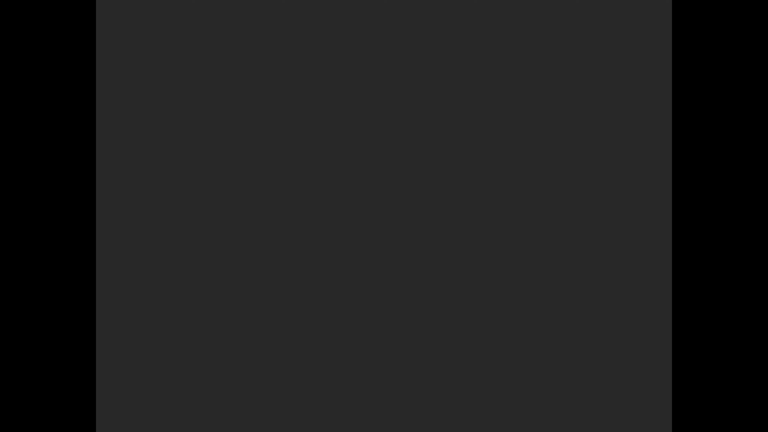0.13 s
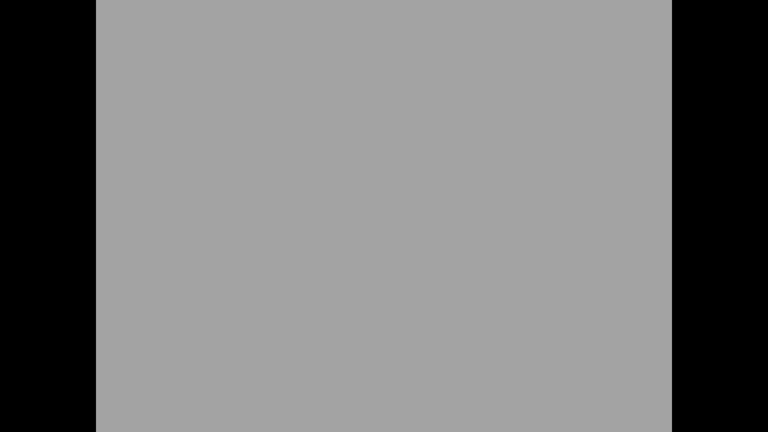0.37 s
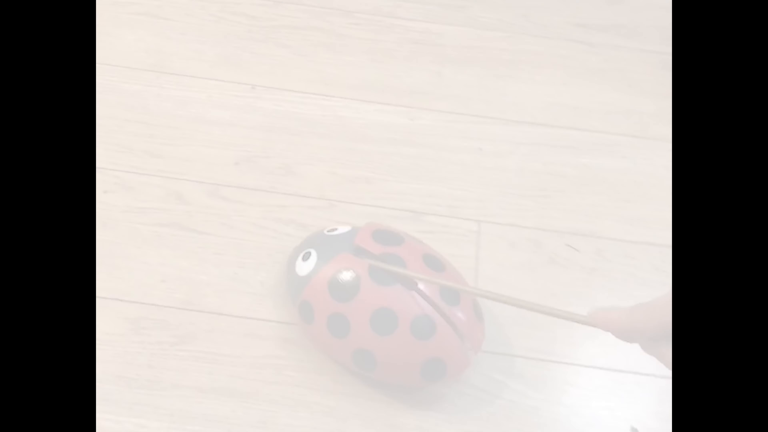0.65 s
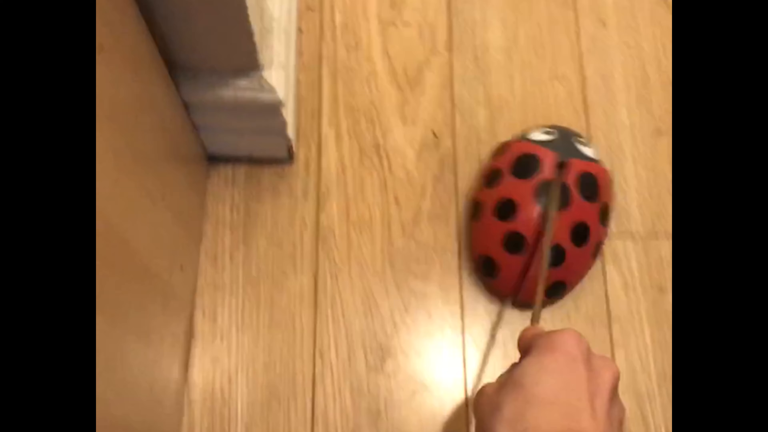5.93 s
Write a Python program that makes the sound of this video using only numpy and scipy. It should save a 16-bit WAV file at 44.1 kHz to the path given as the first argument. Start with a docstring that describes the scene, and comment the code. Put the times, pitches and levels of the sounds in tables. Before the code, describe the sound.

After two quiet seconds of faint ticking and isolated clicks, a light plastic wheeled toy rattles, scrapes and clacks unevenly across hard flooring.

```python
"""Hollow toy rolling on laminate

A hollow plastic toy on small wheels is pushed by a stick over a hard laminate floor, close to a camera.
Lumpy noise stands for the wheels grinding: it drives resonances of boards, hollow and walls, and a scrape.
Loose parts clack and floor seams thump as dying modes with a little room echo; the axle squeaks thinly.
The camera ticks softly twenty times a second at first, over filtered noise for hiss and handling rumble."""
import sys
import numpy as np
from scipy import signal
from scipy.fft import rfft, irfft, next_fast_len
from scipy.io import wavfile
from scipy.ndimage import map_coordinates

SR = 44100
rng = np.random.default_rng(int(sys.argv[2]) if len(sys.argv) > 2 else 0)


def elevation(decibels):
    """Turn decibel levels (scalar or array-like) into linear amplitude ratios."""
    levels = np.asarray(decibels, float)
    return 10 ** (levels / 20)


def store_wav(level_fs):
    """Save 16-bit WAV to argv[1]."""
    pcm = np.round(np.clip(np.atleast_2d(level_fs), -1, 1) * 32767)
    wavfile.write(sys.argv[1], SR, pcm.T.astype(np.int16))


N = 266094  # length in samples

# The hand on the stick: t/s, push/dB, extra hum of the hollow/dB, extra weight on the boards/dB
PUSH = [(0.35, -76, -7, 4.5), (0.72, -71, 3.0, 7.5), (0.95, -57.5, 2.5, -2.5), (1.3, -46, 2.5, -6.0),
        (1.9, -56.5, 5, 2), (1.97, -29.5, -0.5, -16.5), (2.4, -33.5, -2.5, -5), (2.8, -43, 3.5, -4),
        (3.1, -37.5, 11.5, -1.5), (3.4, -46, 7.5, -4), (3.8, -28, -2.5, -18.5), (4.1, -26.5, -0.3, -11.5),
        (4.4, -53, 11, 10), (4.8, -43.5, 4, 1.5), (5.2, -45, 13, 1.8), (5.6, -40.5, 5, 5.5),
        (6.03, -40.5, 3.5, -1.9)]
# The wheels lurch forward: middle t/s, length/s, rise/dB, harshness/dB
SURGES = [(0.392, 0.082, 4, 2.5), (0.548, 0.079, 10, -5), (0.673, 0.035, 4.7, 2.2),
          (0.839, 0.17, 14.5, -0.5), (0.962, 0.094, 4.5, 1.5), (1.606, 0.028, 7.5, 0),
          (1.745, 0.034, 7, 0.2), (1.85, 0.027, 9.5, -2.5), (2.652, 0.048, 6.0, 2), (3.357, 0.14, 7.5, 1.5),
          (4.344, 0.2, 10, 1.7), (4.447, 0.081, 11, 1), (4.573, 0.21, 10.5, 2.3), (4.851, 0.32, 1.3, 1.45),
          (5.034, 0.099, -0.4, 1.96), (5.254, 0.034, 2, 1.6), (5.434, 0.12, 2, 2.5),
          (5.547, 0.054, 6.5, -0.2), (5.775, 0.025, 9, -2.5), (5.934, 0.11, 1, 0.9)]
# The wheels hang back: middle t/s, length/s, change/dB, harshness/dB
STALLS = [(0.895, 0.068, -12, -1), (1.205, 0.14, -9, -1), (1.354, 0.07, -7.5, -5.5),
          (1.538, 0.054, -7.5, -0.9), (1.675, 0.033, -6.5, -4), (1.931, 0.031, -18, 1),
          (1.973, 0.055, -5.5, -0.4), (2.08, 0.16, -17, -0.8), (2.205, 0.054, -10.5, -1.6),
          (2.284, 0.056, -3.2, 1), (2.331, 0.071, -9.0, 0.5), (2.454, 0.047, -13, -0.7),
          (2.541, 0.16, -1.5, -0.8), (2.822, 0.12, -6.5, -1.5), (3.026, 0.17, -3.5, 2.5),
          (3.218, 0.039, -8, 0), (3.419, 0.06, -7, -1.5), (3.685, 0.096, -14.5, -3.5),
          (3.823, 0.099, -22.5, -2.8), (3.95, 0.14, -9, -1), (4.1, 0.12, -21, -1.3),
          (4.237, 0.029, -19, -0.5), (4.787, 0.04, -5.1, -0.8), (4.959, 0.038, -8, 0),
          (5.186, 0.083, -4.8, 2), (5.585, 0.082, -17, -1.1), (5.67, 0.047, -21, -13),
          (5.804, 0.165, -5.5, 4.5)]
# How the rolling leans: t/s, upper over lower boards/dB, rim over other walls/dB, fizz over scrape/dB
LEAN = [(.4, 6, 2, -30), (.8, 6, -1, -37), (1.9, 6.5, 5.5, -22), (2.0, -1, -18, -28), (2.4, 12, -13, -11),
        (2.9, 4.5, -17, -14), (3.4, -2, -13.5, -19.5), (3.9, -14, -11, -19), (4.3, -14, -7.5, -20.5),
        (4.55, -3.5, -2, -22), (4.8, -6.5, -15, -17.5), (5.2, 4.5, -9, -15.5), (5.6, 3.5, -7, -23.5),
        (6.0, 12, -7, -17)]
# Resonances of the floor boards, the upper ones from the fourth row: f/Hz, width/Hz, relative level/dB
BOARD_MODES = [(223, 74, 0), (297.6, 34, 0), (403.5, 72, 5), (424, 243, -3.5), (610, 390, -2.5)]
# Resonances of the air inside the shell: f/Hz, width/Hz, relative level/dB
HOLLOW_MODES = [(908.4, 105, 1), (969, 147.4, -0.5)]
# Resonances of the shell walls, the last two of the rim: f/Hz, width/Hz, relative level/dB
WALL_MODES = [(1248, 425, 2.5), (1692, 78, 8), (1886, 170, 3), (2906, 240, -10.5), (3350, 65, -18),
              (4150, 140, -13), (2340, 59, 6.5), (2596, 150, 0.5)]
# Spectrum of the wheels' scrape: f/Hz, relative level/dB
SCRAPE_SPECTRUM = [(1500, -2.5), (3000, 7.5), (3700, 3.5), (4300, -4.5), (5200, -5.5), (6300, -8.5),
                   (7400, -21), (9000, -66)]
# Spectrum of the finer fizz above it: f/Hz, relative level/dB
FIZZ_SPECTRUM = [(5000, -11), (7600, -11), (8800, -10.5), (10500, -18.5), (12500, -16), (15500, -27)]
# Clacks: t/s, level/dB, favoured mode f/Hz, bite of the upper modes/dB, treble/dB
CLACKS = [(0.9214, -18.5, 2400, -25, -60), (1.38, -21, 2410, -27, -58), (1.412, -33, 2430, -27, -44),
          (1.701, -23, 2390, -28, -63), (2.0014, -20.5, 1620, -45, -40), (2.018, -27, 1850, -25, -45),
          (2.1005, -9.5, 2020, -17.5, -39), (2.119, -28, 2160, -18, -38), (2.4676, -37, 1300, -28, -19),
          (2.4861, -16.5, 2420, -13.5, -37), (2.5017, -15.5, 1780, -36, -51), (2.8807, -19, 1300, -40, -51),
          (2.9108, -14.5, 1280, -25, -36), (2.9292, -25, 2570, -20, -45), (2.9567, -42, 2800, -20, -48),
          (2.9747, -10.5, 2570, -16.5, -44), (3.1095, -24.5, 3050, -17, -26.5),
          (3.4522, -14, 2300, -14.5, -33), (3.5304, -24, 1610, -10, -17), (3.5903, -33, 1340, -30, -42),
          (3.8582, -9, 2660, -12.5, -52), (3.8711, -11.5, 1870, -43, -49), (3.8914, -43, 1910, -21, -25),
          (4.032, -29, 1870, -45, -27), (4.2467, -38, 1720, -10, -28), (4.263, -29, 1300, -22, -14),
          (4.2717, -19.5, 2900, -18, -15), (4.2961, -11, 2550, -9.5, -38), (4.3886, -16, 2630, -16, -23),
          (4.405, -20.5, 1500, -19, -17), (4.4186, -19, 3180, -14, -17), (4.4262, -18, 2750, -12, -16),
          (4.4485, -26, 2820, -21, -19), (4.599, -24, 2670, -18, -19), (4.6454, -18.5, 2520, -11, -28),
          (4.6914, -9, 2150, -11, -48), (4.725, -27, 2800, -14, -24), (4.8082, -23.5, 2980, -23, -21.5),
          (4.849, -36, 1650, -20, -21), (4.9883, -34, 3100, -5, -22), (5.1394, -29.5, 2850, -15, -23),
          (5.214, -41, 2800, -9, -17), (5.2346, -26, 2550, -18, -33), (5.3294, -37, 1404, -9, -34),
          (5.354, -31, 2870, -19, -37), (5.5458, -26, 2530, -28, -43), (5.6281, -9.5, 2190, -13.5, -35),
          (5.7875, -28.5, 2580, -5, -16), (6.0137, -9, 3420, -10, -34)]
# Modes of the shell when struck: f/Hz, relative level/dB
STRUCK_MODES = [(950, -9), (1400, -6), (1650, -5), (2080, -3), (2350, -3), (2700, -4), (3050, -7),
                (3430, -3), (3800, -5), (4150, -3), (4600, -5), (5000, -6), (5400, -8)]
# Thumps: t/s, level/dB, main swing f/Hz, its time to fall by 60 dB/s
THUMPS = [(0.444, -33.5, 70.4, 0.029), (0.446, -44, 265, 0.023), (0.913, -39, 61, 0.047),
          (0.992, -39, 99.6, 0.033), (1.329, -35.5, 64.6, 0.069), (1.558, -51, 88.8, 0.075),
          (1.86, -38, 86.1, 0.042), (1.864, -37.5, 260, 0.029), (2.279, -34.5, 597, 0.09),
          (2.402, -30, 607, 0.033), (2.599, -31.5, 77.4, 0.036), (2.911, -15.5, 282, 0.019),
          (2.922, -22, 462, 0.027), (3.186, -31.5, 507, 0.022), (3.601, -47, 79.4, 0.1),
          (3.872, -33.5, 297, 0.053), (3.974, -24, 237, 0.06), (4.153, -34.5, 306.4, 0.32),
          (4.253, -24, 309, 0.054), (4.41, -29.5, 312, 0.16), (4.499, -25.5, 404, 0.082),
          (4.749, -26.5, 370, 0.067), (5.197, -44, 560, 0.052), (5.253, -24.5, 530, 0.05),
          (5.355, -21.5, 305, 0.081), (5.595, -24.5, 575, 0.04), (5.706, -26, 466, 0.035),
          (5.791, -26, 473, 0.037), (5.97, -30.5, 487, 0.056)]
# Squeaks of the axle: start t/s, end t/s, level/dB
SQUEAKS = [(2.48, 2.603, -78), (2.902, 2.937, -81), (3.093, 3.148, -68), (5.397, 5.434, -73),
           (5.464, 5.574, -79), (5.564, 5.624, -70), (5.955, 6.013, -68)]
# Modes of one camera tick: f/Hz, relative level/dB, time to fall by 60 dB/s
TICK_MODES = [(1300, 1, 0.0078), (2080, 6.5, 0.0071), (2800, -4, 0.012), (3390, 7.5, 0.0039),
              (3950, -19, 0.0086), (5200, -46, 0.01)]
# Ticks off the beat: t/s, level/dB
STRAY_TICKS = [(.163, -53), (.183, -57), (.1997, -43.5), (0.2227, -51), (0.3732, -46.5), (.394, -50),
               (.413, -47), (0.6513, -55.5), (0.663, -54), (.7632, -58), (1.1633, -52), (1.201, -43)]
# Shifts of the grip on the camera: middle t/s, length/s, change/dB
JOGS = [(.13, .06, -4), (.92, 0.051, 8), (1.34, 0.22, 5), (1.59, 0.031, 14.5), (2.0, .04, -8),
        (2.6, 0.22, 20), (2.93, 0.38, 14), (3.17, .1, -12), (3.6, 0.28, 18.5), (3.9, 0.29, 6),
        (4.1, 0.21, -21), (4.62, .15, -3), (4.76, .12, 16), (5.16, 0.18, 16), (5.39, .12, 26),
        (5.6, 0.35, 4)]
# Spectrum of the handling rumble: f/Hz, relative level/dB
RUMBLE_SPECTRUM = [(12, -50), (31, -30), (47, -6), (60, 10), (182, -13), (220, -30), (290, -29),
                   (480, -120)]
# Spectrum of the camera hiss: f/Hz, relative level/dB
HISS_SPECTRUM = [(100, -10), (200, 12), (500, 5.5), (1000, 0), (1600, 0), (2200, -2.5), (3500, -10),
                 (5500, -9.5), (8000, -14), (16000, -15)]
# Echo of the room: f/Hz, time to fall by 60 dB/s
ROOM_DECAY = [(200, 0.34), (2000, 0.091), (10000, 0.44)]

# Share of a lurch and of its harshness that reaches the boards
BOARDS_FOLLOW, BOARDS_HARSH = 0.42, 0.73
# Scrape in dB at a push of -45 dB; then dB per dB of push, of lurch and of harshness
SCRAPE_DB, SCRAPE_GROWS, SCRAPE_FOLLOWS, SCRAPE_HARSH = -71, 0.21, 0.25, 3.67
STEP_S, STEP_DB = 1.945, 17.5  # around here the scrape becomes this much louder
# Loose parts jitter on after a clack: dB against its level, share of its bite, s to fall by 60 dB
SETTLE_DB, SETTLE_BITE, SETTLE_T60 = -25, 0.45, 0.57
FIRST_TICK_S, TICK_EVERY_S, TICK_COUNT = 0.2335, 0.05002, 35
TICK_DB, TICK_SCATTER_DB, TICK_SCATTER_S = -44, 0.1, 0.00081
# The hand rumbles on the camera; the low rumble is quieter from RUMBLE_DROPS_S
RUMBLE_DB, RUMBLE_DROPS_S, LATER_DB = -59.5, 1.985, -73.5
SWAY_DB = -62  # the deepest part, only before the drop
HISS_DB = -69
START_S, TOP_HZ = 0.118, 15850  # the sound switches on; nothing is left above the top


def rolling():
    """The roughness of the floor under the wheels drives boards, hollow, walls and scrape."""
    t = np.arange(N) / SR
    push_db, hum_db, weight_db = curves(PUSH)
    lurch_db, harsh_db = swells(list(SURGES) + list(STALLS))
    boards_lean, rim_lean, fizz_lean = curves(LEAN)

    boards_db = push_db + weight_db + BOARDS_FOLLOW * lurch_db + BOARDS_HARSH * harsh_db
    hollow_db = push_db + hum_db + lurch_db - harsh_db - 2.5
    walls_db = push_db + lurch_db + harsh_db - 3.0
    step = np.clip((t - STEP_S) / 0.05 + 0.5, 0, 1)
    scrape_db = SCRAPE_DB + SCRAPE_GROWS * (push_db + 45) + STEP_DB * step
    scrape_db += SCRAPE_FOLLOWS * lurch_db + SCRAPE_HARSH * harsh_db

    jolts_db = 1.08 * wobble(60) + 1.56 * wobble(130)  # shared by all parts
    board_jolts = band(grit(jolts_db, own_db=2.1, rate=35, specks_db=9.5), 145, 1190)
    boards = leaning(board_jolts, BOARD_MODES, boards_lean, count=3, wander_db=1.65, rate=18)
    hollow_jolts = band(grit(jolts_db, own_db=-1.0, rate=44, specks_db=23.0), 560, 1360)
    hollow = unit(filtered(hollow_jolts, resonances(HOLLOW_MODES)))
    wall_jolts = band(grit(1.02 * jolts_db, own_db=0.5, rate=150, specks_db=20.0), 830, 3630)
    walls = leaning(wall_jolts, WALL_MODES, rim_lean, count=6, wander_db=3.0, rate=13)

    rub = coloured(grit(1.03 * jolts_db, own_db=2.0, rate=420, specks_db=9.5), SCRAPE_SPECTRUM)
    fizz = coloured(grit(0.84 * jolts_db, own_db=1.5, rate=300, specks_db=19), FIZZ_SPECTRUM)
    scrape = blend(rub, elevation(3.0 * wobble(76)) * fizz, fizz_lean)
    scrape_strength = np.sqrt(elevation(2 * scrape_db) + settling())

    shell = elevation(boards_db) * boards + elevation(hollow_db) * hollow + elevation(walls_db) * walls
    moving = np.clip((t - 0.33) / 0.037, 0, 1)
    return moving * (shell + scrape_strength * scrape)


def grit(shared_db, own_db, rate, specks_db):
    """Tiny wheel jolts: noise in lumps, partly common to all parts, with sharp specks of dirt."""
    specks = elevation(specks_db) * (rng.random(N) < 160 / SR)  # about 160 a second
    return elevation(shared_db + own_db * wobble(rate)) * rng.standard_normal(N) * (1 + specks)


def leaning(jolts, peaks, lean_db, count, wander_db, rate):
    """Resonances that wax and wane as the contact shifts; those after the first count lean_db over the rest."""
    modes = []
    for k, (hz, width_hz, db) in enumerate(peaks):
        mode = signal.lfilter(*signal.iirpeak(hz, hz / width_hz, SR), jolts)
        modes.append((-1) ** k * elevation(db + wander_db * wobble(rate)) * mode)
    return blend(unit(sum(modes[:count])), unit(sum(modes[count:])), lean_db)


def settling():
    """Power of the loose parts' jitter, which dies away after each clack."""
    s, db, hz, bite_db, treble_db = np.transpose(CLACKS)
    kick_power = elevation(2 * (db + SETTLE_BITE * bite_db + SETTLE_DB))
    kicks = np.bincount(np.round(s * SR).astype(int), kick_power, N)
    return signal.lfilter([1], [1, -elevation(-120 / (SETTLE_T60 * SR))], kicks)


def clacks():
    """Each blow chatters for a few ms: it rings the shell's modes, rattles on and spits treble."""
    out, spit, t = np.zeros(N + SR), np.zeros(N + SR), np.arange(SR // 8) / SR
    modes_hz, modes_db = np.transpose(STRUCK_MODES)[:, :, None]
    t60 = 0.014 / (1 + (modes_hz / 3600) ** 2)  # plastic damps the high modes first
    sides = np.pi * np.arange(len(STRUCK_MODES))[:, None]  # neighbours start in opposite directions
    rattle_fade = elevation(-60 * t / 0.1) + elevation(6.5 - 60 * t / 0.018)
    spit_fade = elevation(-60 * t / 0.0098) + 0.26 * elevation(-60 * t / 0.13)
    for s, db, hz, bite_db, treble_db in CLACKS:
        size, detune = rng.standard_normal((2, len(STRUCK_MODES), 1))
        hiss, chatter, rattle = rng.standard_normal((3, len(t)))
        near_db = -10.5 * np.abs(np.log2(modes_hz / hz))  # modes near the favoured one ring most
        struck_db = np.where(modes_hz > 3200, bite_db + 14.5, near_db)
        level_db = modes_db + struck_db + 2.1 * size
        modes = ring(modes_hz * (1 + 0.047 * detune), level_db, t60, t, sides).sum(0)
        modes += ring(hz, -6.5, 0.022, t)
        blow = elevation(-22) * np.exp(-(t / 0.0039) ** 2) * chatter
        blow[0] = 1
        shell = signal.fftconvolve(blow, modes)[:len(t)]
        shell = shell / np.abs(shell).max() + elevation(bite_db - 15.5) * rattle_fade * rattle
        add(out, s, elevation(db - 2.26) * shell)
        add(spit, s, elevation(db + treble_db + 4.5) * spit_fade * hiss)
    out, spit = out[:N], spit[:N]
    return band(out, 385, 6000) + band(spit, 5300, 9500) + elevation(-12) * band(spit, 11700, 15400)


def thumps():
    """Wheels drop over seams and the stick jogs: a sudden push, then the boards swing out."""
    out, t = np.zeros(N + SR), np.arange(SR // 4) / SR
    push = 0.55 * (t / 0.0013) * (1 - t / 0.0016) * np.exp(-t / 0.0012)
    for s, db, hz, t60 in THUMPS:
        swing = ring(hz, 2.4, t60, t)
        swing += ring(1.445 * hz, 0.46, 0.49 * t60, t) + ring(0.616 * hz, -5.2, 0.24 * t60, t)
        add(out, s, elevation(db) * (push + swing * (1 - np.exp(-t / 0.0013))))
    return band(out[:N], 73, 3000)


def squeak():
    """A thin, unsteady whistle of the axle: noise through one narrow resonance."""
    t = np.arange(N) / SR
    gate = sum(elevation(db) * np.clip(np.minimum(t - a, b - t) / 0.012, 0, 1) for a, b, db in SQUEAKS)
    return gate * unit(filtered(rng.standard_normal(N), resonances([(10700, 45, 0)])))


def room(x):
    """Echo of a small hard room: a noise tail in which each frequency dies at its own speed."""
    hz, t, z = signal.stft(rng.standard_normal(SR // 2), SR, nperseg=256)
    fade = elevation(-60 * t / along(ROOM_DECAY, hz)[:, None])
    tail = signal.istft(z * fade, SR, nperseg=256)[1]
    late = np.pad(x, (150, 0))  # the echo starts 150 samples later
    return signal.fftconvolve(late, tail / np.linalg.norm(tail))[:N]


def camera():
    """The camera's own sound: ticks, the rumble of the hand holding it, and hiss."""
    hiss = elevation(HISS_DB) * coloured(rng.standard_normal(N), HISS_SPECTRUM)
    return ticks() + handling() + hiss


def ticks():
    """Short bursts of dying modes, all of one shape, on a slightly loose beat and off it."""
    out, t = np.zeros(N + SR), np.arange(SR // 40) / SR
    tick = sum(ring(hz, db, t60, t) for hz, db, t60 in TICK_MODES)
    tick *= 1 - np.exp(-(t / 0.00022) ** 2)  # soft onset
    late, size = rng.standard_normal((2, TICK_COUNT))
    beat_s = FIRST_TICK_S + TICK_EVERY_S * np.arange(TICK_COUNT) + TICK_SCATTER_S * late
    beat_db = TICK_DB + TICK_SCATTER_DB * size
    for s, db in list(zip(beat_s, beat_db)) + list(STRAY_TICKS):
        add(out, s, elevation(db) * tick)
    return out[:N]


def handling():
    """Low noise from the hand on the camera: it swells as the grip shifts and drops in level once."""
    early = np.arange(N) < RUMBLE_DROPS_S * SR
    rumble_db = np.where(early, RUMBLE_DB, LATER_DB) + swells(JOGS)[0]
    sway = early * elevation(SWAY_DB) * unit(band(rng.standard_normal(N), 24, 47))
    rumble = unit(elevation(0.54 * wobble(12)) * coloured(rng.standard_normal(N), RUMBLE_SPECTRUM))
    return elevation(rumble_db) * rumble + sway


def unit(x):
    """Scales a sound to rms 1."""
    return x / np.sqrt(np.mean(x ** 2) + 1e-20)


def along(points, hz):
    """Reads (f/Hz, value) points on a log frequency axis."""
    f, v = np.transpose(points)
    return np.interp(np.log(hz + 1), np.log(f + 1), v)


def curves(rows):
    """One value per sample for each column after the time."""
    s, *cols = np.transpose(rows)
    return [np.interp(np.arange(N) / SR, s, c) for c in cols]


def swells(rows):
    """Bell-shaped swells (middle s, length s, sizes..) summed, one curve for each size."""
    middle, length, *sizes = np.transpose(rows)
    t = np.arange(0, N / SR + 0.01, 0.002)
    bell = np.exp(-(2 * (t - middle[:, None]) / length[:, None]) ** 2)
    return [np.interp(np.arange(N) / SR, t, size @ bell) for size in sizes]


def wobble(rate):
    """A smooth random curve through rate random points a second."""
    points = rng.standard_normal(int(N * rate / SR) + 4)
    return map_coordinates(points, [np.arange(N) * rate / SR])


def filtered(x, response):
    """Multiplies the spectrum of x by a response given as a function of frequency."""
    m = next_fast_len(N + SR // 2)
    return irfft(rfft(x, m) * response(np.fft.rfftfreq(m, 1 / SR)), m)[:N]


def resonances(peaks):
    """The response of a set of (f/Hz, width/Hz, level/dB) resonances, with signs that alternate."""
    def response(f):
        total = 0
        for k, (hz, width_hz, db) in enumerate(peaks):
            drag = 1j * f * width_hz
            total = total + (-1) ** k * elevation(db) * drag / (hz * hz - f * f + drag)
        return total
    return response


def coloured(x, spectrum):
    """Filters x by a spectrum table and scales it to rms 1."""
    return unit(filtered(x, lambda hz: elevation(along(spectrum, hz))))


def band(x, low_hz, high_hz):
    """Keeps what lies between two frequencies."""
    return signal.sosfilt(signal.butter(3, [low_hz, high_hz], "band", fs=SR, output="sos"), x)


def blend(low, high, lean_db):
    """Mixes two sounds of rms 1 to about rms 1, the second lean_db over the first."""
    return (low + elevation(lean_db) * high) / np.sqrt(1 + elevation(2 * lean_db))


def ring(hz, db, t60, t, phase=0):
    """One dying mode: a sine that falls by 60 dB in t60 seconds."""
    return elevation(db - 60 * t / t60) * np.sin(2 * np.pi * hz * t + phase)


def add(track, s, sound):
    """Mixes sound into track from time s."""
    track[round(s * SR):][:len(sound)] += sound


def scene():
    """Toy, room and camera; only clacks and thumps are given an echo."""
    hits = clacks() + thumps()
    return (rolling() + hits + squeak() + elevation(-9) * room(hits) + camera())[None]


def roll_off(x):
    """The treble ends steeply here."""
    return signal.sosfilt(signal.butter(12, 16440, fs=SR, output="sos"), x)


def record(dry):
    """Silences the mix until the sound switches on and cuts off the top treble."""
    on = np.arange(N) >= START_S * SR
    mix = filtered(dry[0] * on, lambda hz: hz < TOP_HZ)[None]
    return roll_off(mix)


dry = scene()
out = record(dry)
store_wav(out)
```